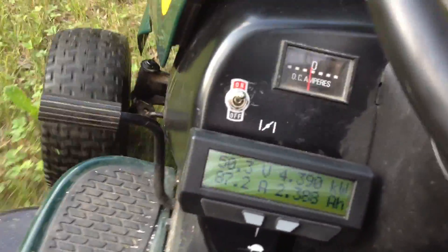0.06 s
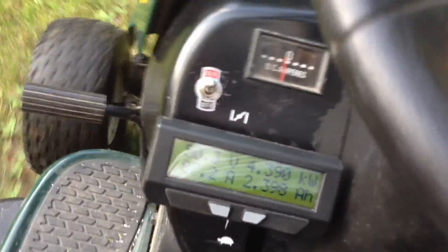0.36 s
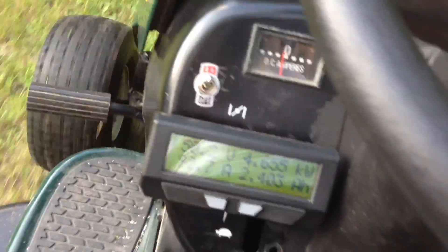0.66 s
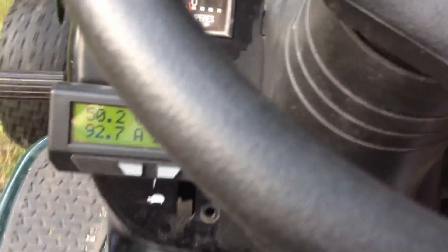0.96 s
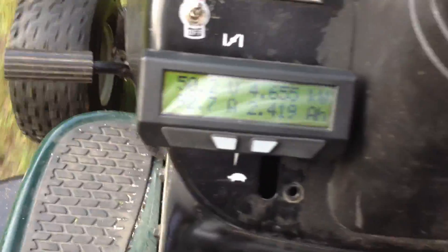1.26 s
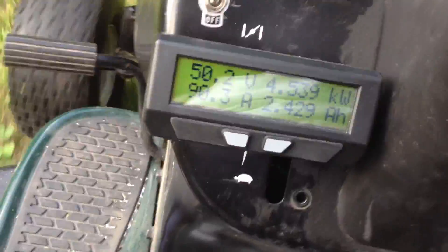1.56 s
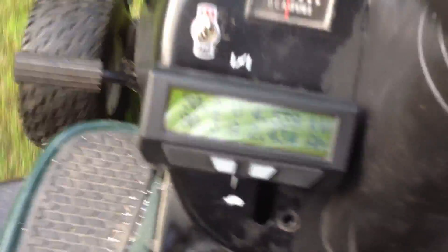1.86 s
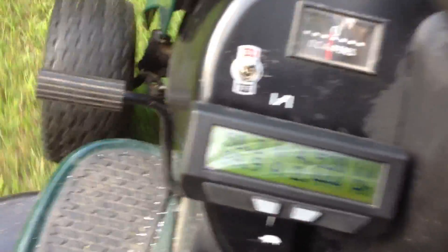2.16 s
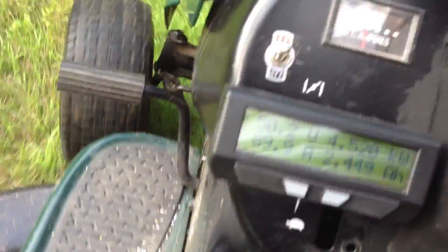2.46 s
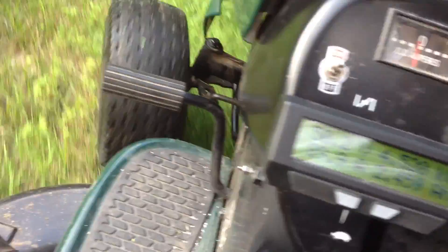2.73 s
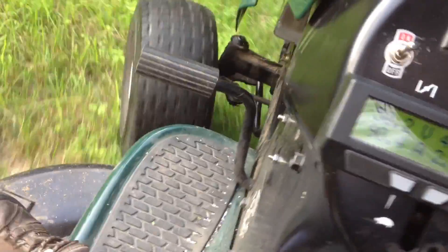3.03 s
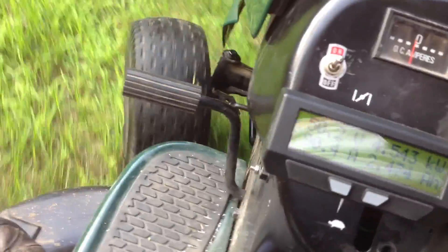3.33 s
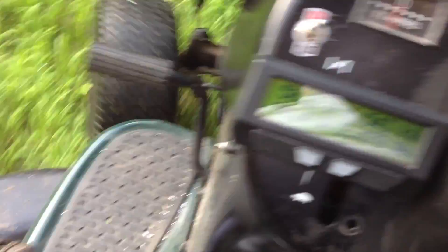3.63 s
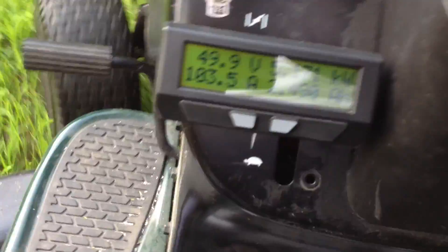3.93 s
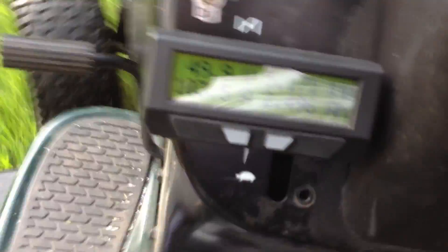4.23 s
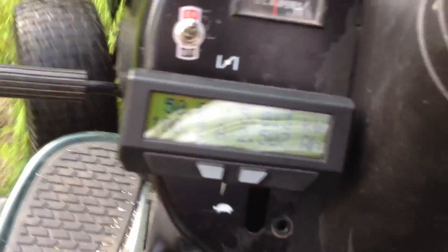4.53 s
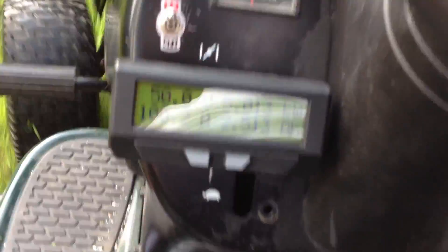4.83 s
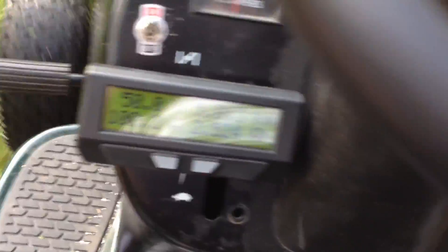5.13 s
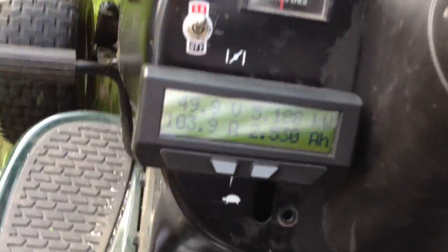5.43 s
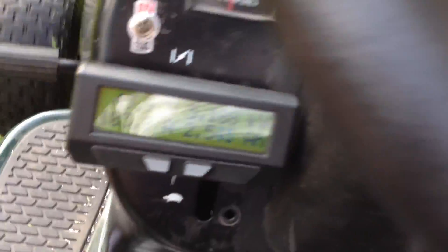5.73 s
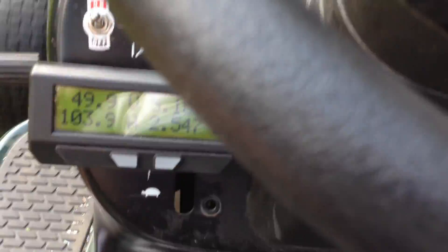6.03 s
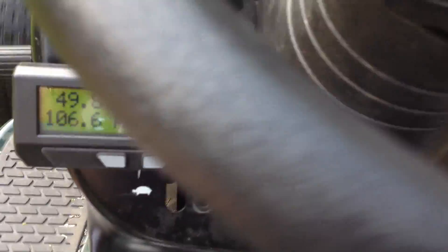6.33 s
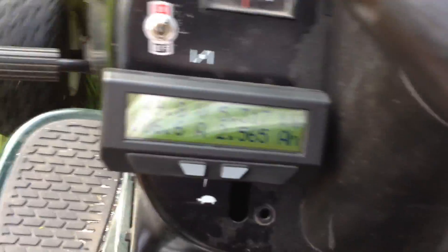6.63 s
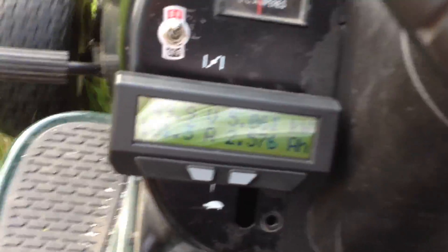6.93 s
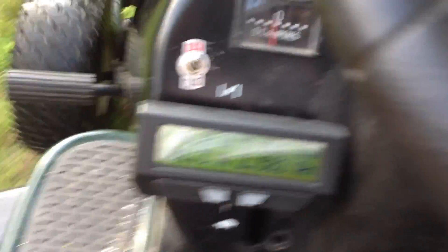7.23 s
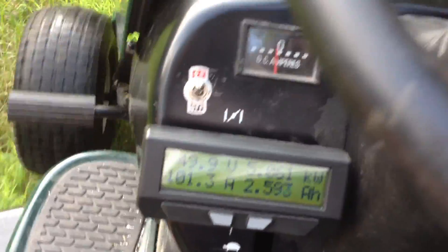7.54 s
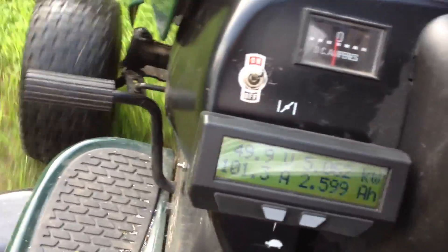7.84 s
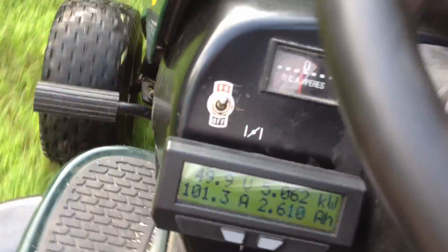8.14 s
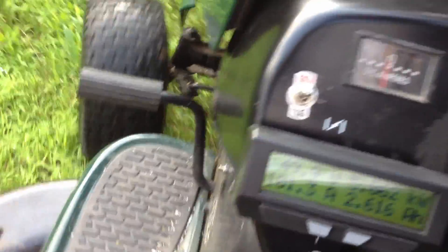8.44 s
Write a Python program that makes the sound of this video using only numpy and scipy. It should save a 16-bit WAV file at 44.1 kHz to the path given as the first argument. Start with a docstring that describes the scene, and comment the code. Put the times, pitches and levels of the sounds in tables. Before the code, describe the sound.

An electric lawn tractor mows grass for the whole eight and a half seconds, heard close from the seat. Its blades make a loud, low drone that swells and fades, dipping at about 0.7, 2.2, 3.6, 4.9, 6.1 and 7.4 seconds. Air roars constantly under the blade cover and clippings hiss against the steel, both coming forward slightly in each dip, so the overall loudness stays fairly even. A thin, wavering motor whine sits faintly above, a little stronger from about 3.4 seconds, as the blade pitch sags slightly. A lower, fluttering whirr from the drive is clearest around 7.5 seconds. A loose steel part gives brief, light rattles over bumps at around 0.7 seconds, in a cluster from 1.7 to 2.5, faintly just after 4, and several times between 5.9 and 8. The mower is still running at the end.

```python
"""An electric lawn tractor mows grass, heard from the seat. Its belt-driven blades drone, swelling and
fading as they slip in and out of step. Air roars under the deck (the cover over the blades), clippings
hiss against it, the motor whines, the drive whirrs and a loose steel part rattles over bumps.
An automatic volume control lifts the roar and hiss each time the drone fades."""
import sys
import numpy as np
from scipy import signal
from scipy.fft import rfft, irfft, next_fast_len
from scipy.io import wavfile
from scipy.ndimage import uniform_filter1d, map_coordinates

SR = 44100
rng = np.random.default_rng(int(sys.argv[2]) if len(sys.argv) > 2 else 0)


def output_pcm(signal):
    """Save a mono or channel-first signal as 16-bit PCM at the path in sys.argv[1].

    Samples are clipped to [-1, 1] before scaling.
    """
    pcm = np.clip(np.atleast_2d(signal).T, -1, 1) * 32767
    wavfile.write(sys.argv[1], SR, np.round(pcm).astype(np.int16))


N = 378819

# air roar and clipping hiss as the grass thickens and thins: t/s, air level/dB, hiss level/dB
GRASS_LOAD = [(0.0, -18.3, -36.8), (.35, -18.5, -33.3), (.7, -19.3, -33.6), (1.05, -17.5, -32.6),
              (1.9, -19.5, -35), (2.5, -17, -31.2), (2.85, -19.7, -34.3), (3.5, -19.4, -34.2),
              (3.73, -18.3, -31.3), (4.09, -19.6, -31.8), (4.4, -17.3, -30), (5.1, -18.2, -30.1),
              (6.05, -21.1, -33), (6.43, -18.7, -30), (6.82, -21.2, -33.3), (7.45, -17.2, -29.1),
              (7.92, -19.2, -32), (8.3, -18.1, -29.6)]


def amp(db):
    """Turn decibels into a factor to multiply by."""
    return 10 ** (np.asarray(db) / 20)


def unit(x):
    """Scale x to an average power of 1."""
    return x / np.sqrt(np.mean(x ** 2) + 1e-20)


def curves(rows):
    """Join the rows with straight lines: one value per sample for each column after the time."""
    times, *columns = np.transpose(rows)
    return [np.interp(np.arange(N) / SR, times, column) for column in columns]


def wobble(rate):
    """A smooth curve through `rate` random points a second."""
    points = rng.standard_normal(int(N * rate / SR) + 4)
    return map_coordinates(points, [np.arange(N) * rate / SR])


def filtered(x, response):
    """Multiply each frequency in x by response(frequency)."""
    size = next_fast_len(N + SR // 2)
    return irfft(rfft(x, size) * response(np.fft.rfftfreq(size, 1 / SR)), size)[:N]


def coloured(x, spectrum):
    """Shape x by rows of f/Hz, level/dB, then scale it to a power of 1."""
    f, db = np.transpose(spectrum)
    return unit(filtered(x, lambda hz: amp(np.interp(np.log(hz + 1), np.log(f), db))))


def patchy(x, depth_db, span_bins=10, hold_frames=12):
    """Make random patches of x, each a narrow band for a brief moment, louder or softer."""
    spectra = signal.stft(x, nperseg=512)[2]
    patches = uniform_filter1d(rng.standard_normal(spectra.shape), span_bins, 0)
    patches = uniform_filter1d(patches, hold_frames, 1)
    return signal.istft(spectra * amp(depth_db * unit(patches)), nperseg=512)[1][:N]


def resonance(f, centre_hz, width_hz):
    """How a part with one ringing note responds at frequency f; a narrow one rings longer."""
    return 1j * f * width_hz / (centre_hz ** 2 - f ** 2 + 1j * f * width_hz)


def tone(phase):
    """A sine wave with a power of 1."""
    return np.sqrt(2) * np.sin(phase)


def beat(slip, harmonic, depth_db):
    """Gain of a tone that swells and fades: depth_db when harmonic * slip is whole, 1 halfway between."""
    floor = amp(depth_db) ** 2
    return np.sqrt(floor + (1 - floor) * np.sin(np.pi * harmonic * slip) ** 2)


def blades(phase, hum_db=-25, drone_db=-5.1, buzz_db=-1.8, sway_db=.5, flutter_db=.55):
    """Two low tones swell and fade as the blades slip; higher ones waver in the swirling air."""
    # moments when the blades cancel each other's drone: t/s, fade depth/dB
    fades = [(-.8, -14), (.71, -16), (2.24, -13), (3.58, -25), (4.88, -13), (6.08, -22), (7.36, -10),
             (8.5, -15), (9.6, -14)]
    # the tone at three times the blade pass rate: t/s, level/dB
    third_levels = [(0, -22.5), (.68, -18.5), (.97, -26), (1.55, -21.5), (1.86, -31), (2.25, -18.5),
                    (2.8, -22.5), (4.25, -20.5), (4.48, -33), (4.92, -18.5), (5.25, -28), (6.05, -22.5),
                    (6.3, -30), (6.68, -20.5), (7.1, -28), (7.52, -18), (7.82, -29), (8.3, -20)]
    # the tone at four times that rate: t/s, level/dB
    fourth_levels = [(0, -28), (.35, -34), (.65, -24.5), (1.85, -34), (2.08, -26), (2.9, -26.5),
                     (3.08, -34), (3.3, -26), (4.3, -30), (4.8, -26.5), (5.9, -35), (6.7, -28), (7.05, -31),
                     (7.4, -27), (8.59, -30)]
    # the high tones that make the buzz: multiple of the pass rate, relative level/dB
    buzz_tones = [(5, -36), (6, -38), (7, -36.5), (8, -36.5), (9, -41), (10, -37), (11, -44)]
    fade_times, _ = np.transpose(fades)
    slip = np.interp(np.arange(N) / SR, fade_times, (np.arange(len(fades)) - 1) / 2)  # 0.5 per fade
    depth_db, = curves(fades)
    third_db, = curves(third_levels)
    fourth_db, = curves(fourth_levels)
    hum_gain = amp(hum_db + sway_db * wobble(9))
    hum_gain *= beat(slip - .625, harmonic=1, depth_db=-12)  # fades half as often as the drone
    drone_gain = amp(drone_db + sway_db * wobble(9) + flutter_db * wobble(35))
    drone_gain *= beat(slip, harmonic=2, depth_db=depth_db + 3 * wobble(16))
    hum = hum_gain * tone(phase + .08 * wobble(12) + 1.24 * wobble(1))
    drone = drone_gain * tone(2 * phase + .05 * wobble(25))
    third = amp(third_db + 1.6 * wobble(10)) * tone(3 * phase + .45 * wobble(7.7) + 1.2 * wobble(1.5))
    fourth = amp(fourth_db + 2.5 * wobble(8.8)) * tone(4 * phase + .68 * wobble(7))
    buzz = sum(amp(db + 3.5 * wobble(4)) * tone(multiple * phase + 1.15 * wobble(9))
               for multiple, db in buzz_tones)
    return hum + drone + third + fourth + amp(buzz_db) * buzz


def deck_air(phase, churn_db=-1, roar_db=-2.17, chop=.1, gust_db=.45, edge_hz=2300, edge_width_hz=550):
    """Swirling air booms under the deck and roars at the blade tips, pulsing as each blade passes."""
    # air churned under the deck: f/Hz, relative level/dB
    churn_spectrum = [(20, -27.5), (70, -26.5), (105, -14), (135, -14), (175, -4.5), (215, 2.5), (285, 2),
                      (330, -1.5), (400, -15), (700, -41)]
    # air torn by the blade tips: f/Hz, relative level/dB
    roar_spectrum = [(150, -19), (380, 1.5), (650, 1.5), (760, -1.5), (950, 0), (1170, -1.5), (1350, -4),
                     (1530, -5), (1650, -4), (1850, -9.5), (2120, -10.5), (2500, -17), (3300, -26.5),
                     (7000, -51)]
    # boost or cut at the roar's upper edge: t/s, gain/dB
    edge_gains = [(0, -.8), (4.5, -1.2), (5.3, 1), (8.59, 1.6)]
    flow_db, _ = curves(GRASS_LOAD)
    edge_db, = curves(edge_gains)
    churn = coloured(rng.standard_normal(N), churn_spectrum)
    swirls = patchy(rng.standard_normal(N), depth_db=1.5, span_bins=6)
    roar = coloured(swirls * (1 + chop * np.sin(phase)), roar_spectrum)
    edge = filtered(roar, lambda hz: np.exp(-((hz - edge_hz) / edge_width_hz) ** 2))
    roar += (amp(edge_db) - 1) * edge
    return amp(flow_db) * (amp(churn_db) * churn + amp(roar_db + gust_db * wobble(25)) * roar)


def clippings(phase, hiss_db=1, ring_db=-8, chop=.099, clump_db=1, ticks_per_s=700, fine_hz=8300):
    """Cut grass sprays on the deck in clumps: a fine hiss with tiny ticks, ringing the steel a little."""
    # clippings hitting the deck: f/Hz, relative level/dB
    hiss_spectrum = [(1000, 3.5), (3000, 0), (4200, 3.5), (5100, 1.5), (6200, 1), (7200, 1), (7900, -2),
                     (8800, 0), (10000, 0.5), (12000, 2), (13500, 2.5), (14300, -3), (15200, -6.5)]
    # steel singing under the spray: f/Hz, relative level/dB
    ring_spectrum = [(3000, -42), (4100, -12), (4550, -2), (4750, 2), (4900, -6.5), (5100, -30),
                     (6000, -60)]
    # finer spray sounds brighter: t/s, treble level over the rest/dB
    fineness = [(0.0, -1), (1.2, -.3), (2.1, -1.3), (4.5, 2.2), (5.77, -.7), (7.1, -1.4), (8.58, 1.3)]
    _, cut_db = curves(GRASS_LOAD)
    fine_db, = curves(fineness)
    ticks = unit((rng.random(N) < ticks_per_s / SR) * rng.standard_normal(N))
    throw = (1 + chop * np.sin(phase + wobble(6))) * amp(clump_db * wobble(80))
    impacts = (rng.standard_normal(N) + .38 * ticks) * throw
    spray = coloured(patchy(impacts, depth_db=1.2), hiss_spectrum)
    coarse = filtered(spray, lambda hz: 1 / (1 + (hz / fine_hz) ** 10))
    hiss = amp(-fine_db / 2) * coarse + amp(fine_db / 2) * (spray - coarse)
    ring = coloured(rng.standard_normal(N), ring_spectrum)
    return amp(cut_db + .5 * wobble(11)) * (amp(hiss_db) * hiss + amp(ring_db) * ring)


def motor(phase, cycles_per_pass=41.18, passes_per_belt=14, swing_hz=56, clean_hz=8, rough_hz=27):
    """The motor whines, rougher when weak; its pitch flicks up once per trip of the belt."""
    # strength of the motor's whine: t/s, level/dB
    whine_levels = [(0, -42.5), (1, -40.5), (1.4, -43), (2.3, -39.5), (3.05, -43.5), (3.45, -36.5),
                    (3.96, -37), (4.15, -44), (5.15, -35), (5.37, -43), (5.48, -36), (6.0, -37.3),
                    (6.45, -43), (6.65, -34), (7.8, -35.5), (8.02, -43), (8.25, -38)]
    level_db, = curves(whine_levels)
    jitter_hz = clean_hz + (rough_hz - clean_hz) / (1 + np.exp(level_db + 39.5))  # rough below -39.5 dB
    belt_tug = -np.abs(np.sin(phase / passes_per_belt / 2))
    offset_hz = swing_hz * (belt_tug - belt_tug.mean()) + jitter_hz * wobble(160)
    gain = amp(level_db + 1.4 * wobble(9) + 2.1 * wobble(45))  # slow sway and fast flicker
    return gain * tone(cycles_per_pass * phase + 2 * np.pi * np.cumsum(offset_hz) / SR)


def drive(pitch_hz=1648, waver_hz=18, flutter_db=3.5):
    """The drive gives a rough, fluttering whirr, lower than the motor's whine."""
    # strength of the drive's whirr: t/s, level/dB
    whirr_levels = [(0, -38), (1.7, -48), (3, -43), (4.9, -37), (5.8, -37), (6.8, -38), (7.2, -34),
                    (7.6, -31), (7.95, -45), (8.59, -36)]
    level_db, = curves(whirr_levels)
    phase = 2 * np.pi * np.cumsum(pitch_hz + waver_hz * wobble(60)) / SR
    return amp(level_db) * unit(amp(flutter_db * wobble(25)) * tone(phase))


def rattles(level_db=11, click_db=-6, taps_per_s=1500, release_s=.004):
    """Each bump shakes a loose part into a flurry of taps that click and ring the steel frame."""
    # bumps: t/s, relative level/dB, time before dying away/s, share of dry click (0-1)
    bumps = [(.617, -31, .015, .3), (.756, -24, 0.0046, .8), (.803, -31, 0.022, 0.5), (1.742, -34, .02, 0),
             (1.785, -31, .01, .05), (1.802, -24, 0.016, 0.15), (1.913, -26, 0.0099, 0.1),
             (2.003, -28, 0.019, .08), (2.2, -32, .012, .2), (2.547, -32, .01, 0.35),
             (4.067, -31, .015, 0.2), (4.13, -33, .012, 0.2), (4.446, -31, .01, .2),
             (5.885, -25, .014, 0.31), (6.206, -27.5, .014, 0.35), (6.491, -29, .018, 0.12),
             (7.112, -28, .04, .7), (7.441, -27, .01, .3), (7.496, -27, .006, 0.59),
             (7.993, -28, 0.0092, .3)]
    # ringing notes of the steel frame: f/Hz, width/Hz, relative level/dB
    steel_notes = [(2200, 360, 1), (3060, 260, -1), (4690, 350, 3.5), (7270, 140, -7), (8610, 130, 0),
                   (10400, 130, -3.5), (11200, 180, -2), (12300, 220, -11)]
    force = np.zeros((2, N))
    for start_s, db, hold_s, click_share in bumps:
        start = round(start_s * SR)
        age = np.arange(min(SR // 8, N - start)) / SR
        flurry = amp(db) * np.exp(-np.maximum(age - hold_s, 0) / release_s)
        force[:, start:start + len(age)] += np.outer([1 - click_share, click_share], flurry)
    taps = unit((rng.random(N) < taps_per_s / SR) * rng.choice([-1, 1], N))
    ring_taps, click_taps = force * taps
    ring = filtered(ring_taps,
                    lambda f: sum(amp(db) * resonance(f, hz, width) for hz, width, db in steel_notes))
    click = filtered(click_taps, lambda f: resonance(f, centre_hz=6000, width_hz=6900))
    return amp(level_db) * (ring + amp(click_db) * click)


def scene():
    """Add up the mower's sounds; blade speed sets the pace of the drone, air, clippings and whine."""
    # blade speed, sagging in thicker grass: t/s, blade pass rate/Hz
    blade_speed = [(0.0, 116.9), (0.83, 116.2), (1.05, 116.7), (1.54, 117.2), (1.88, 117.2), (2.52, 117.2),
                   (2.78, 116.8), (3.25, 114.6), (4.69, 115.5), (5.17, 114.4), (5.48, 112.6), (5.72, 113.5),
                   (6.02, 114.8), (6.55, 114.5), (7.17, 115.6), (7.66, 113.8), (8.23, 115.2), (8.58, 115)]
    pass_hz, = curves(blade_speed)
    phase = 2 * np.pi * np.cumsum(pass_hz) / SR  # one cycle per blade pass
    return (blades(phase) + deck_air(phase) + clippings(phase) + motor(phase) + drive() + rattles())[None]


def volume_control(x, rest_db=-7, squeeze=.41, follow_s=.033):
    """Turn the sound down when it is louder than rest_db and up when it is quieter."""
    memory = np.exp(-1 / (follow_s * SR))
    power = signal.lfilter([1 - memory], [1, -memory], x ** 2, zi=[amp(rest_db) ** 2])[0]
    excess_db = 10 * np.log10(power + 1e-9) - rest_db
    return x * amp(-squeeze * excess_db)


def record(dry, peak_hardness=9, top_hz=15330):
    """Even out the volume, round off the highest peaks and remove everything above top_hz."""
    x = volume_control(dry[0])
    x = x / (1 + np.abs(x) ** peak_hardness) ** (1 / peak_hardness)
    return filtered(x, lambda hz: hz < top_hz)[None]


dry = scene()
out = record(dry)
output_pcm(out)
```